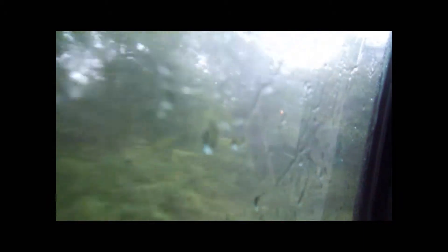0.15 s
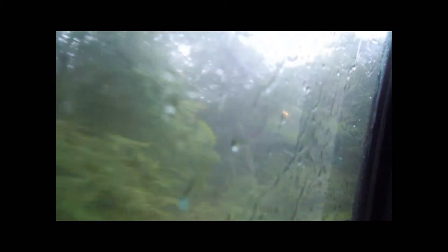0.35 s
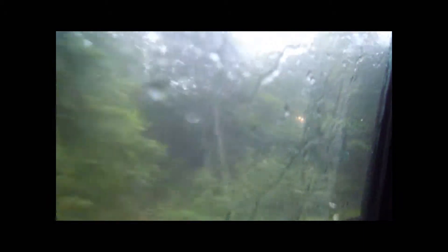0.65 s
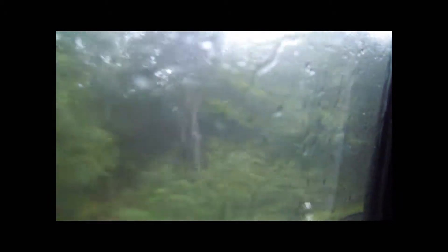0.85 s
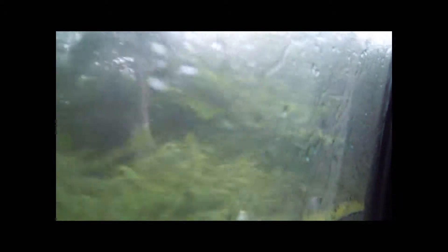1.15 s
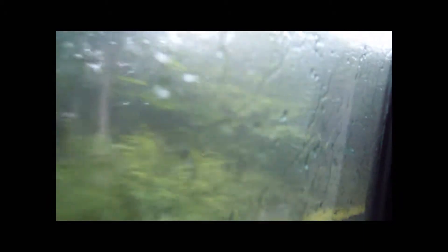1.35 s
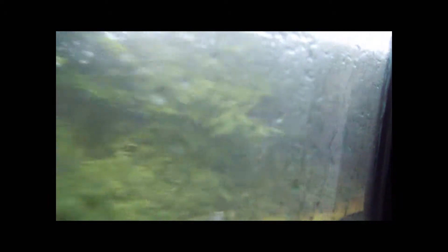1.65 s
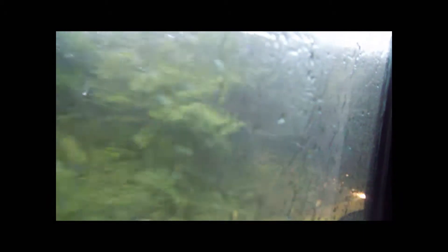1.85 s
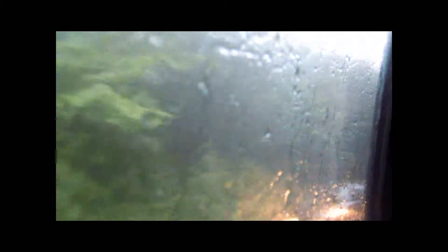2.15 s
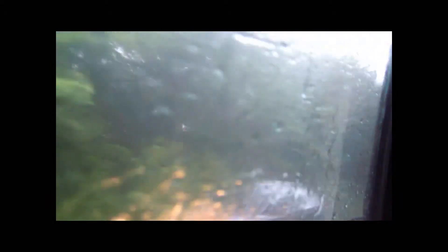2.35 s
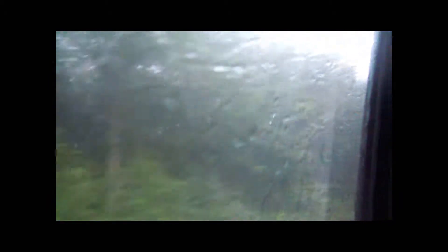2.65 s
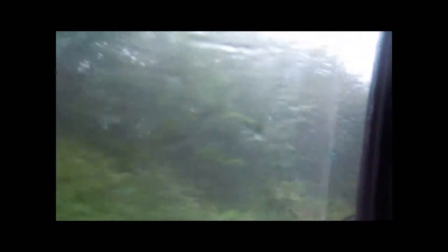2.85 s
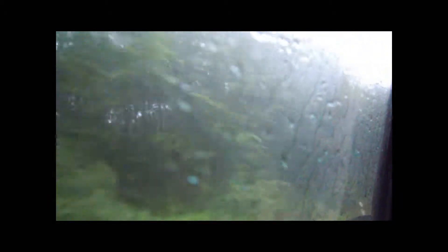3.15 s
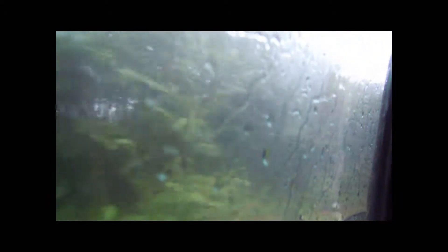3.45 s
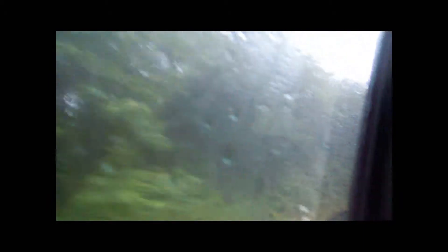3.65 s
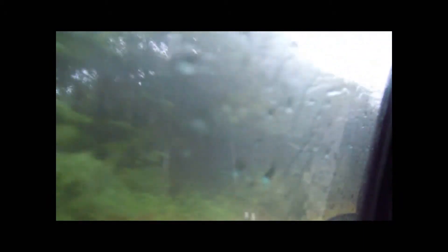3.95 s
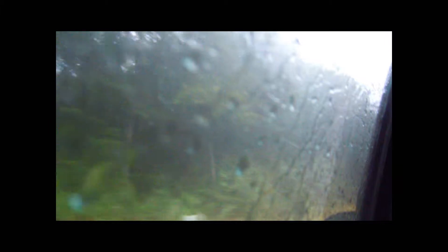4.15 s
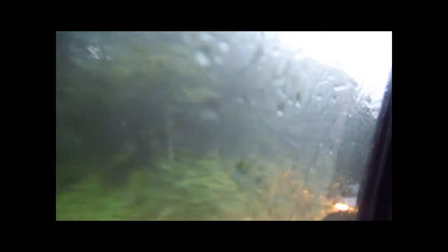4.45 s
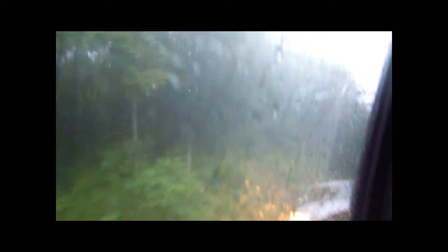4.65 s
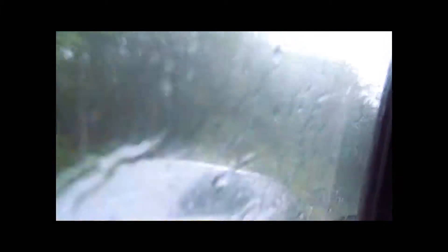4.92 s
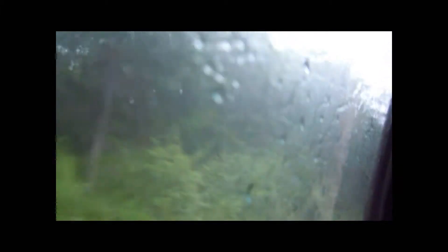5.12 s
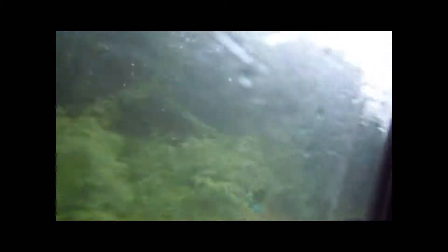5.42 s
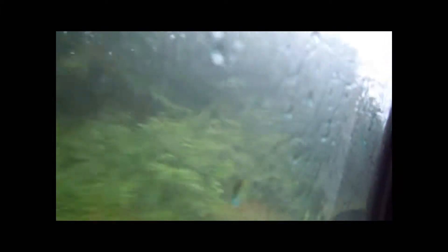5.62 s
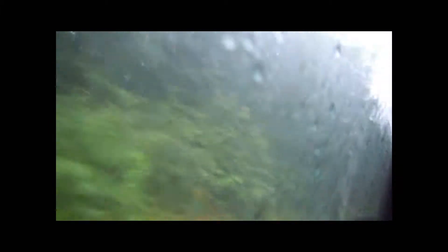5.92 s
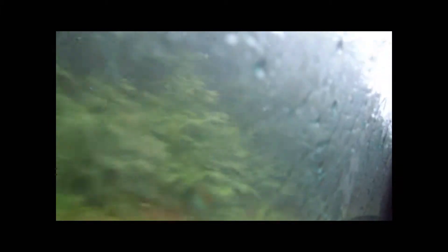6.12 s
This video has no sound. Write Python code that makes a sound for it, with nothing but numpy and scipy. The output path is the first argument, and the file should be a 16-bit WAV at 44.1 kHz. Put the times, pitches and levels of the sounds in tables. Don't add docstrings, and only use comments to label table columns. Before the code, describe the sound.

Close, enclosed cabin sound, one channel. Bright crackling raindrops strike glass and bodywork over a fine rain hiss. Underneath, the engine drones low and the body thumps softly over uneven road, with muffled wet tyre roar. The big drops come thickly at first, ease around two seconds, then fall irregularly, with a brief denser rush just before six seconds. The ride never stops.

```python
import sys
import numpy as np
from scipy import signal
from scipy.fft import rfft, irfft, next_fast_len
from scipy.io import wavfile
from scipy.ndimage import uniform_filter1d

SR = 44100
rng = np.random.default_rng(int(sys.argv[2]) if len(sys.argv) > 2 else 0)


def int16_out(signal):
    q = np.round(np.clip(np.atleast_2d(signal).T, -1, 1) * 32767)
    wavfile.write(sys.argv[1], SR, q.astype(np.int16))


def field_ratio(decibels):
    return 10 ** (np.asarray(decibels, dtype=float) / 20)


N = 276948
T_S = np.arange(N) / SR


def rms_one(x):
    return x / np.sqrt(np.mean(x ** 2) + 1e-20)


def in_time(rows):
    t_s, *columns = np.transpose(rows)
    return [np.interp(T_S, t_s, column) for column in columns]


def drift(rate_hz):
    hop, settle = 40, 2000
    pole = np.exp(-2 * np.pi * rate_hz * hop / SR)
    noise = rng.standard_normal(N // hop + settle + 2)
    slow = signal.lfilter([1], [1, -2 * pole, pole ** 2], noise)[settle:]
    slow = rms_one(slow - slow.mean())
    return np.interp(np.arange(N) / hop, np.arange(len(slow)), slow)


def coloured(spectrum):
    f_hz, level_db = np.transpose(spectrum)
    size = next_fast_len(N, real=True)
    bins_hz = np.arange(1, size // 2 + 2) * SR / size
    gain_db = np.interp(np.log(bins_hz), np.log(f_hz), level_db, left=-90, right=-90)
    bins = rfft(rng.standard_normal(size)) * field_ratio(gain_db)
    return rms_one(irfft(bins, size)[:N])


def band(x, low_hz, high_hz):
    return signal.sosfilt(signal.butter(2, [low_hz, high_hz], "band", fs=SR, output="sos"), x)


# t/s, level/dB
PASSING = [
    (4.6, -80),
    (4.74, -56),
    (5.0, -53.5),
    (5.07, -54),
    (5.12, -80),
]


def passing():
    centre_hz = 4420
    hiss_band = band(rng.standard_normal(N), 0.973 * centre_hz, 1.027 * centre_hz)
    return field_ratio(in_time(PASSING)[0]) * rms_one(hiss_band)


# t/s, firing rate f/Hz, firing tone level/dB
ENGINE = [(0.0, 68.75, -31.7), (0.3, 68.43, -32.0), (0.6, 67.73, -28.3), (0.9, 67.25, -24.7),
          (1.2, 67.06, -23.5), (1.8, 67.18, -24.6), (2.1, 67.35, -27.0), (2.4, 67.39, -25.4),
          (3.9, 67.83, -25.6), (4.2, 67.94, -24.7), (4.8, 68.21, -25.2), (5.1, 68.47, -28.3),
          (5.7, 68.66, -28.1), (6.0, 68.82, -26.9), (6.28, 69.1, -27.5)]
# t/s, level/dB re cruise
THROTTLE = [
    (0, -4),
    (.5, -2.8),
    (1.5, 0),
    (2.5, 0),
    (4.5, 0),
    (4.85, 0.5),
    (5.1, -3),
    (5.8, -2.5),
    (6.28, -5),
]
# multiple of firing rate, level/dB
WEAK_ORDERS = [
    (2.5, -60),
    (3, -50),
    (4, -56.5),
    (5, -58),
]


def engine():
    second_db, sixth_db, sixth_follows = -31.5, -48, 1.64
    buzz_s, buzz_width_s, buzz_peak_db = 0.41, 0.53, 11
    firing_hz, load_db = in_time(ENGINE)
    throttle_db, = in_time(THROTTLE)
    angle = 2 * np.pi * np.cumsum(firing_hz) / SR
    buzz_db = buzz_peak_db * np.exp(-((T_S - buzz_s) / buzz_width_s) ** 2)
    out = field_ratio(load_db + 0.1 + 0.9 * drift(1.0)) * np.cos(angle)
    second = field_ratio(second_db + throttle_db + 0.43 * drift(3.1))
    out += second * np.cos(2 * angle - 0.8)
    sixth = field_ratio(sixth_db + sixth_follows * throttle_db + buzz_db + 0.5 * drift(4.4))
    out += sixth * np.cos(6 * angle)
    for order, level_db in WEAK_ORDERS:
        phase = rng.uniform(0, 2 * np.pi)
        out += field_ratio(level_db + 2.5 * drift(2.5)) * np.cos(order * angle + phase)
    return np.sqrt(2) * out


# t/s of the peak, level/dB
BUMPS = [(.05, -38), (.61, -24), (1.07, -30), (1.36, -28), (1.53, -19.5), (1.82, -19.5), (2.1, -33),
         (2.31, -27), (2.48, -21.5), (2.75, -21), (2.85, -20), (3.14, -23.5), (3.31, -25), (3.63, -21),
         (3.92, -30), (4.06, -25), (4.29, -31), (4.41, -25), (4.55, -29), (4.68, -26), (4.84, -17),
         (4.91, -24.5), (5.03, -21), (5.32, -21), (5.66, -29), (5.9, -26.5), (6.03, -16.5), (6.21, -20.5)]


def jolts():
    ride_db, rise_s, fall_s = -30, 0.025, 0.056
    power = np.full(N, field_ratio(2 * ride_db))
    for t_s, level_db in BUMPS:
        age_s = T_S - t_s
        width_s = np.where(age_s < 0, rise_s, fall_s)
        power += field_ratio(2 * level_db) * np.exp(-(age_s / width_s) ** 2)
    return np.sqrt(power)


# f/Hz, density/dB
SHAKE = [(5, -4), (9, 3.5), (16, 6.5), (22, 3), (33, 0), (50, -9), (70, -5)]


def body_shake():
    shake = coloured(SHAKE)
    shake = shake / np.sqrt(0.11 + uniform_filter1d(shake ** 2, size=3600))
    return jolts() * shake


# f/Hz, density/dB
BOOM = [(35, -17), (55, 6), (92, 6), (115, 0.5), (195, 0.5), (230, -1.5), (310, -7), (375, -5),
        (460, -12.5), (600, -15.5)]


def cabin_boom(wet_db):
    follows, sag_db_per_s = 0.72, 0.49
    level_db = -31 + follows * wet_db - sag_db_per_s * T_S
    return field_ratio(level_db + 0.48 * drift(12)) * coloured(BOOM)


# f/Hz, density/dB
ROAR = [(400, -9), (480, -5.5), (560, -7), (630, 5.5), (780, -2.5), (1000, -1.5), (1070, -4.5), (1130, 1),
        (1280, -6), (1400, -5), (1700, -11), (2400, -12.5)]


def tyre_roar(wet_db):
    return field_ratio(-43.5 + wet_db + 0.92 * drift(8.7)) * coloured(ROAR)


# f/Hz, density/dB
TREAD = [(640, -18), (740, -3.5), (810, -5.5), (880, -11.5), (940, -8), (1040, -24)]


def tread_whine(wet_db):
    smooth_end_s, blend_s, smooth_cut_db, follows = 1.75, 0.6, 11.4, 0.58
    smooth = np.clip((smooth_end_s - T_S) / blend_s, 0, 1)
    return field_ratio(-45 + follows * wet_db - smooth_cut_db * smooth) * coloured(TREAD)


# t/s, level/dB re mean
DRIVE = [(0, -2.5), (.37, 0), (.6, -1), (1.28, 1.5), (1.75, 0.2), (2.03, -0.5), (2.27, -2), (2.55, -1.5),
         (2.97, -1.5), (3.38, 1.5), (3.8, 0), (4.23, 2.5), (4.6, 4.5), (5.0, -2.5), (5.33, -1.6),
         (5.68, -0.8), (5.98, 3), (6.28, .8)]


def road():
    wet_db, = in_time(DRIVE)
    return body_shake() + cabin_boom(wet_db) + tyre_roar(wet_db) + tread_whine(wet_db)


# t/s, level/dB
SHEETS = [(.44, -1), (.635, -7), (.89, -5), (.975, 5), (1.02, -2), (1.08, 4), (1.25, -3.5), (1.3, 3),
          (1.63, 2), (2.2, -6.5), (2.5, 3), (2.58, -3.5), (2.8, -0.5), (2.98, -3), (3.04, 1), (3.19, 1),
          (3.43, -5), (3.96, 0.5), (4.25, 2.5), (4.35, -3.5), (4.65, 5), (4.87, -2), (5.1, -2), (5.18, -3),
          (5.3, 1.5), (5.38, -1.5), (5.55, -4.5), (5.93, 1.5), (6.12, -2.5), (6.2, 3)]


def sheets():
    half_length_s = 0.021
    return sum(level_db * np.exp(-((T_S - t_s) / half_length_s) ** 2) for t_s, level_db in SHEETS)


# t/s, level/dB
RAINFALL = [(0.0, -39.5), (0.45, -40.5), (1.03, -39.5), (1.17, -39), (1.5, -37.5), (1.71, -41), (1.92, -41),
            (2.12, -44), (2.36, -45), (2.5, -43), (4.18, -41), (4.27, -41), (4.88, -41), (5.28, -42.5),
            (5.61, -42), (5.84, -37.5), (6.28, -43.5)]


def rainfall():
    squall_db, squalls_hz = 0.33, 9.6
    return in_time(RAINFALL)[0] + 1.37 + squall_db * drift(squalls_hz) + sheets()


# f/Hz, density/dB
RAIN = [(700, -20), (1300, -3), (2150, -5.5), (2780, 2.5), (2920, -1), (3150, 2.5), (4200, -1), (5300, -3),
        (7000, -1.5), (8300, 0), (9500, -4.5), (11500, -12.5)]


def hiss(rain_db):
    return field_ratio(rain_db - 4.5 + 1.5 * drift(34)) * coloured(RAIN)


def bursts(clicks, t60_s, rise_s):
    decay = field_ratio(-120 / (t60_s * SR))
    power = signal.lfilter([1], [1, -decay], clicks ** 2 + 1e-18)
    return np.sqrt(signal.lfilter([1], [1, -np.exp(-1 / (rise_s * SR))], power))


def patter(rain_db):
    drops_per_s, spread_db, clump_db, share_db = 500, 6.5, 3.0, 2.4
    rate = drops_per_s * field_ratio(clump_db * drift(23))
    lands = rng.random(N) < rate / SR
    sizes = lands * field_ratio(spread_db * np.minimum(rng.exponential(1, N), 2.2))
    f_hz, level_db = np.transpose(RAIN)
    edges_hz = np.geomspace(1100, 11500, 7)
    out = np.zeros(N)
    for low_hz, high_hz in zip(edges_hz, edges_hz[1:]):
        clicks = sizes * field_ratio(share_db * rng.standard_normal(N))
        gate = rms_one(bursts(clicks, t60_s=0.036, rise_s=0.00034))
        gain_db = np.interp(np.log(low_hz * high_hz) / 2, np.log(f_hz), level_db)
        out += field_ratio(gain_db) * gate * band(rng.standard_normal(N), low_hz, high_hz)
    return field_ratio(rain_db - 3.0) * rms_one(out)


def strays(low_hz, high_hz, count):
    level_db, spread_db = -25, 0.5
    when, size, pitch = rng.random((count, 3)).T
    return np.c_[when * N / SR, level_db + spread_db * (2 * size - 1), low_hz * (high_hz / low_hz) ** pitch]


def splats(drops, swell_s, spray_db, tail_db, tail_s):
    length = 1600
    out, age_s = np.zeros(N + length), np.arange(length) / SR
    shape = age_s / swell_s * np.exp(1 - age_s / swell_s)
    tail = field_ratio(tail_db - 60 * age_s / tail_s) * (1 - np.exp(-age_s / swell_s))
    for t_s, peak_db, ring_hz in drops:
        radius = np.exp(-np.pi * 1.1 * ring_hz / SR)
        turn = 2 * np.pi * min(1.02 * ring_hz, 9800) / SR
        poles = [1, -2 * radius * np.cos(turn), radius ** 2]
        zeros = [0.4, 0.031, -1.82, 0.54, 0.71]
        spray = rms_one(signal.lfilter(zeros, np.convolve(poles, poles), rng.standard_normal(length)))
        ring = shape * np.sin(2 * np.pi * ring_hz * age_s)
        wave = ring + (field_ratio(spray_db) * shape + tail) * spray
        out[int(t_s * SR):][:length] += field_ratio(peak_db - 4.0) * wave / np.abs(wave).max()
    return out[:N]


# t/s, peak level/dB, ring f/Hz
THUDS = [(.1131, -20.5, 2360), (.3885, -28, 2880), (.7532, -38, 2830), (1.072, -20.5, 2010),
         (1.332, -30, 1690), (1.6302, -26, 1500), (1.6737, -24, 1580), (2.1323, -28, 1460),
         (2.3224, -27, 2820), (4.0875, -21, 1150), (4.242, -25, 2780), (4.591, -25, 1600),
         (5.2899, -28.5, 1610), (5.438, -33, 1500), (5.7437, -27, 2500), (5.8947, -24, 1710),
         (5.9207, -26, 1600), (6.0963, -17, 3040), (6.12, -25, 1700), (6.162, -21, 1790)]
# t/s, peak level/dB, ring f/Hz
SPLATS = [(0.232, -21, 3520), (.3198, -20.5, 4800), (0.368, -22, 4200), (.393, -21, 3860),
          (.4653, -22, 3030), (0.5396, -14.5, 3900), (.5641, -20, 4130), (0.612, -24, 3130),
          (0.664, -22, 3120), (0.701, -20.5, 3390), (.7966, -21, 3340), (.82, -14, 3730),
          (.9652, -23, 3470), (1.0939, -25, 3750), (1.6305, -19.5, 3020), (1.933, -25, 4460),
          (2.0572, -26, 3210), (2.6337, -19, 4030), (2.7906, -26, 5000), (3.214, -25, 4750),
          (3.5992, -32, 3150), (4.2358, -27, 5240), (4.463, -22, 3810), (5.0708, -18.5, 4410),
          (5.3033, -17, 3540), (5.386, -23, 4460), (5.439, -20.5, 4480), (5.7072, -23, 4870),
          (5.9802, -17.5, 4800), (6.201, -25, 3810)]


def lower_drops():
    drops = [*THUDS, *SPLATS, *strays(2700, 5300, count=18)]
    return splats(drops, swell_s=0.0008, spray_db=-2.0, tail_db=-9.0, tail_s=0.055)


# t/s, peak level/dB, ring f/Hz
GLASS_DROPS = [(.058, -23, 8100), (.0727, -18.5, 9100), (.3142, -20, 8400), (.5078, -19, 8100), (.54, -13, 9150),
               (.5585, -17, 8350), (.5626, -15, 8670), (.5916, -23, 6200), (.621, -19, 7710), (.6469, -21, 8400),
               (.6663, -18, 8000), (.7018, -19.5, 9000), (.7063, -17, 9200), (.7981, -18, 8300),
               (.8196, -15.5, 6400), (.8934, -20, 9050), (.94, -17, 8590), (.9544, -18.5, 7460),
               (.9662, -14.5, 9250), (1.0695, -17, 5700), (1.1129, -18.5, 8720), (1.1778, -19, 6650),
               (1.2067, -14, 8100), (1.289, -14, 9400), (1.3738, -20, 6800), (1.4093, -19, 8000),
               (1.463, -13.5, 9320), (1.489, -14, 8400), (1.5224, -17.5, 7600), (1.644, -17.5, 6900),
               (1.63, -18, 6700), (1.6837, -23, 8100), (1.8186, -21, 7060), (1.928, -22, 6000),
         (1.9804, -22, 6700), (2.0952, -22, 7610), (2.419, -21, 6300), (2.5028, -20.5, 8120),
         (2.9065, -23, 7100), (3.034, -19, 7870), (3.179, -21, 7200), (3.2096, -20, 7930),
         (3.3043, -21, 7060), (3.6058, -18.5, 7600), (3.6686, -23, 7100), (3.8273, -22, 7950),
         (3.9454, -23.5, 7600), (3.9802, -18.5, 8960), (4.2408, -16, 8700), (4.5042, -20, 7350),
         (4.604, -18, 9600), (4.6269, -22, 8800), (4.9177, -28, 8000), (5.07, -23.5, 5900),
         (5.4273, -19, 8500), (5.612, -18.5, 7930), (5.708, -18, 7700), (5.8566, -21, 8000),
         (6.1619, -17, 7700), (6.2, -15.5, 8100),
               (.0837, -24, 3400), (.1141, -23, 6000), (0.16, -23, 6440), (0.23, -22, 7470), (0.4646, -23, 5600),
        (.5082, -36, 3440), (.6474, -27, 3490), (.657, -20, 9080), (.7407, -24, 6100), (.9173, -24, 6860),
        (.9428, -27, 3880), (1.0335, -28, 8350), (1.1438, -21, 7850), (1.2695, -22, 8400),
        (1.2915, -31, 3930), (1.4416, -26, 8330), (1.492, -29, 3150), (2.037, -25, 7290),
        (2.455, -22, 9300), (2.634, -30, 7400), (2.7916, -22, 6900), (2.8742, -21, 6200),
        (2.929, -28, 7860), (3.336, -21, 7960), (3.7273, -28, 8450), (4.362, -25, 8700), (4.667, -24, 3280),
        (5.2162, -23, 3360), (5.256, -28, 4400), (5.4301, -27, 3160)]


def drops_on_glass():
    drops = [*GLASS_DROPS, *strays(5800, 9200, count=20)]
    return splats(drops, swell_s=0.0008, spray_db=-0.7, tail_db=-7.5, tail_s=0.05)


def scene():
    rain_db = rainfall()
    rain = hiss(rain_db) + patter(rain_db) + lower_drops() + drops_on_glass()
    return (passing() + engine() + road() + rain)[None]


def top_cut(x):
    return signal.sosfilt(signal.butter(12, 11060, fs=SR, output="sos"), x)


def record(dry):
    cutoff_hz = 10205
    mix = signal.sosfilt(signal.butter(24, cutoff_hz, fs=SR, output="sos"), dry)
    return top_cut(mix)


dry = scene()
out = record(dry)
int16_out(out)
```